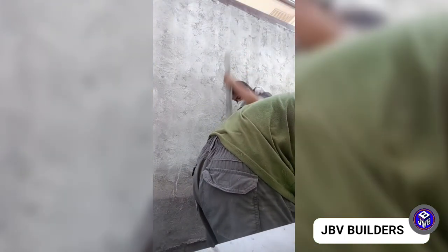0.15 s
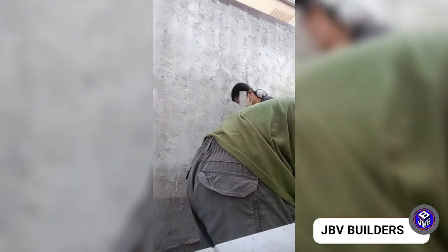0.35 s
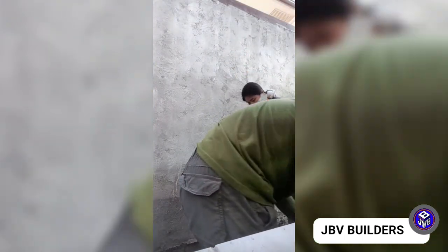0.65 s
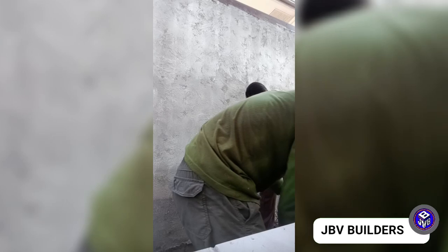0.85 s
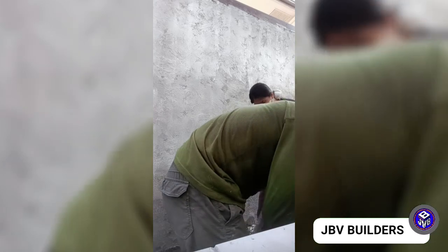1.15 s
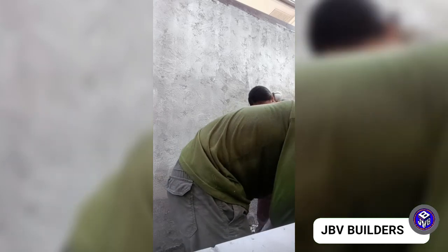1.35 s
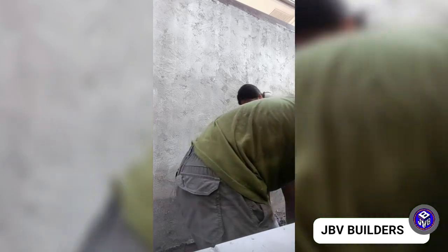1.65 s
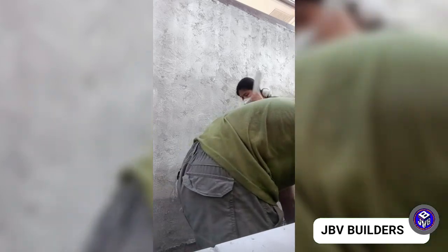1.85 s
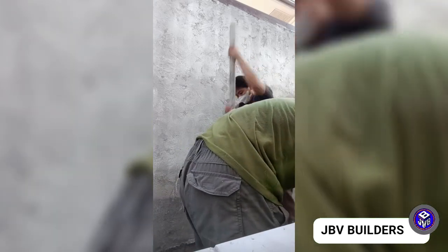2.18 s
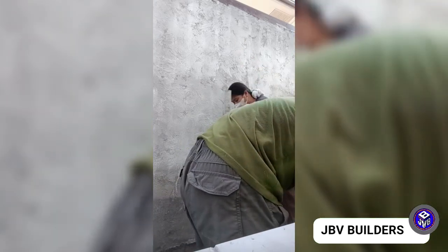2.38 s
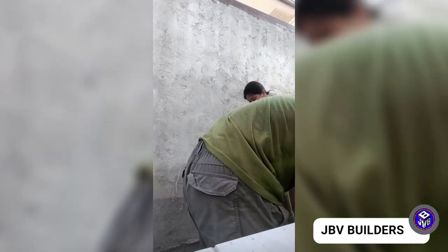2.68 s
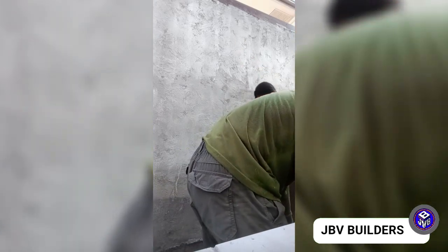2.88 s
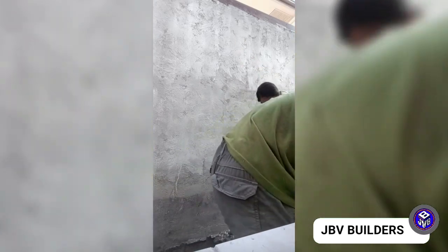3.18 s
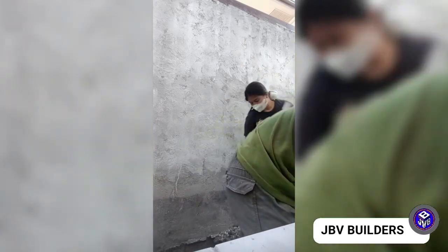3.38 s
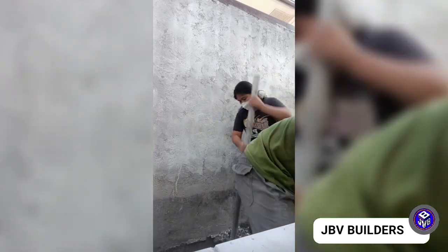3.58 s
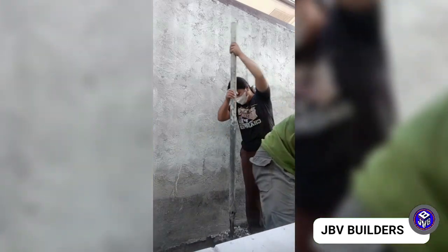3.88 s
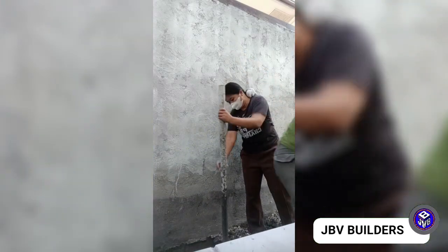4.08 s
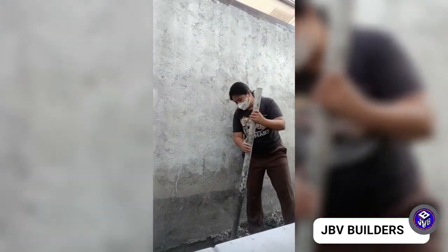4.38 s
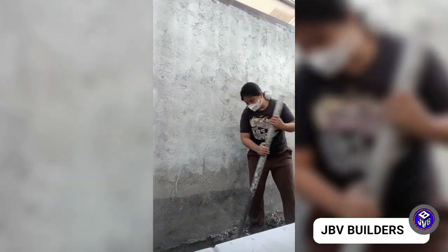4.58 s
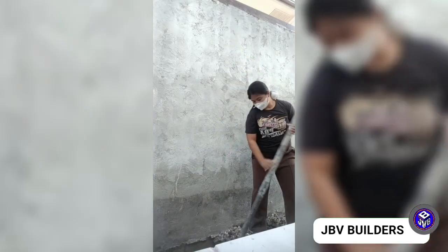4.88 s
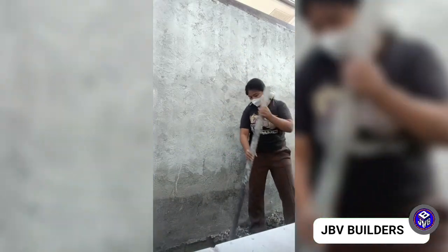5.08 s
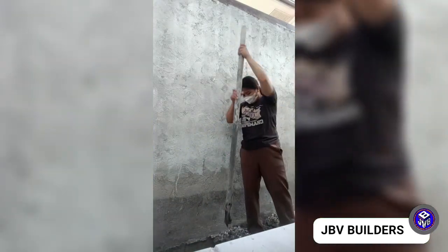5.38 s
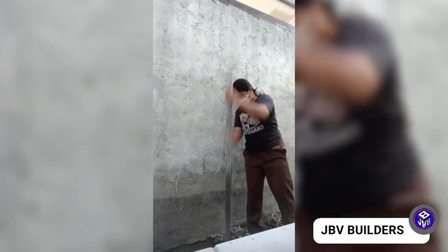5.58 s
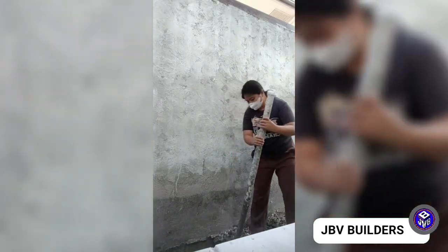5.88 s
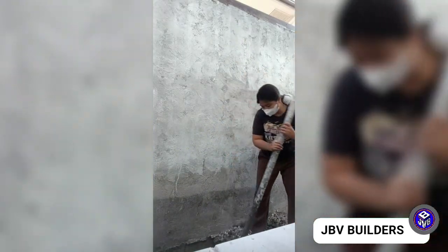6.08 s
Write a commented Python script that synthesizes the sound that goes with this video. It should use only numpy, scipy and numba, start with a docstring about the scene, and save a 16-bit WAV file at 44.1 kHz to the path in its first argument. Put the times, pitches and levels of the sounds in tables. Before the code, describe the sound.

Sharp metallic clangs of a long bar digging into stony ground, with gravel shifting and grinding between the blows.

```python
"""Steel bar in gravel

Beside a concrete wall, a few metres from a phone microphone, a long steel bar is jabbed and levered
into gravel. Each jab crushes grit and rings the bar; levering grinds cobbles, pebbles and grit.
A big stone drops with a thud, single stones clink and rasp, and the ground rumbles over faint site hiss."""
import sys
import numpy as np
from scipy import signal
from scipy.fft import rfft, irfft
from scipy.io import wavfile
from numba import njit

SR = 44100
rng = np.random.default_rng(int(sys.argv[2]) if len(sys.argv) > 2 else 0)


def digitize_waveform(pressure):
    """Quantize a signal to 16-bit integers and store it at the path in sys.argv[1].

    Rows of a 2-D input are taken as channels; values are limited to [-1, 1].
    """
    field = np.atleast_2d(pressure).T
    bounded = np.clip(field, -1, 1)
    quanta = np.round(bounded * 32767).astype(np.int16)
    wavfile.write(sys.argv[1], SR, quanta)


N = 275184
T = np.arange(N) / SR

# Levels in the tables are relative; t60 is the time a ring takes to fall 60 dB.
# jabs of the bar: t/s, crush length/s, bending/dB, bright ring/dB, crack/dB, ground thump/dB
JABS = [(0.129, 0.029, -19.5, -26, -48, -28), (2.227, 0.019, -25, -30, -49, -27.5),
        (2.293, 0.018, -62, -50, -38.5, -35), (3.31, 0.019, -72, -51.5, -68, -63),
        (3.972, 0.03, -26, -17.5, -26.5, -25), (4.308, 0.019, -52, -40.5, -54, -53),
        (4.436, .015, -47, -47, -63, -49), (5.539, 0.027, -57, -24.5, -44, -17.5)]
# modes of the steel bar: f/Hz, level/dB, t60/s
BAR_MODES = [(535, -13.5, 0.21), (832, -7.5, 0.19), (874, -22, 0.164), (1187, -3, 0.073), (1299, -7, 0.12),
             (1520, -18, .2), (1900, -17, 0.28), (2210, -50, .2), (2127, -34, .2), (2623, -9.5, 0.18),
             (2703, -4, 0.38), (2657, -17, 0.72), (3130, -28, 0.11), (3144, -7.5, 0.15), (3280, -5, 0.086),
             (3410, -12.5, 0.2), (3770, -24, 0.32), (4320, -16, 0.074), (4620, -15, 0.14), (4930, -34, .1),
             (5420, -30, 0.12), (5520, -38, 0.15), (6400, -51, 0.18), (7400, -27, 0.13),
             (7870, -14.5, 0.07)]
# packed ground under the tip: f/Hz, level/dB, t60/s
PACKED_GROUND_MODES = [(80.5, -3.5, 0.27), (123, -5.5, 0.14)]
# the bar grinds along stones: peak t/s, rise/s, fall/s, level/dB
GRINDS = [(.2, 0.038, 0.083, -43), (4.16, 0.085, 0.17, -31.5), (4.52, 0.057, 0.073, -45),
          (5.0, 0.15, .1, -50), (5.58, 0.055, .1, -39), (5.8, 0.11, 0.34, -37), (6.2, 0.035, .1, -39)]
# shoves of gravel: peak t/s, rise/s, fall/s, pebbles/dB, cobbles over pebbles/dB, grit over pebbles/dB
SHOVES = [(0.0, 0.37, 0.059, -46, 6, -19), (0.145, 0.018, 0.076, -31, 5, -14),
          (0.223, 0.112, 0.084, -45.5, 5.5, -17), (0.409, 0.24, 0.089, -59.5, -2.5, -6.5),
          (0.498, 0.077, 0.074, -56.5, -2, -12), (0.609, 0.065, 0.13, -59, -6.0, -10),
          (0.741, 0.074, 0.1, -54.5, -2.5, -11.5), (0.842, 0.081, 0.17, -51.5, 5, -5.5),
          (1.017, 0.069, 0.021, -57, 6, -12), (1.17, 0.014, 0.052, -39, 20, -18.5),
          (1.298, 0.2, 0.044, -51, 9.5, -10.5), (1.36, 0.019, 0.026, -52.5, 13, -10),
          (1.452, 0.053, 0.035, -44.5, -1.5, -12), (1.498, 0.062, 0.08, -43.5, -5, -8.5),
          (1.59, 0.22, 0.13, -50.5, -11, -25), (1.759, 0.066, 0.17, -52, -6.5, -4),
          (1.873, 0.073, 0.06, -42, -2, -1.0), (1.925, 0.033, 0.039, -50, 5.5, -1.5),
          (2.052, 0.17, 0.078, -61, 4.5, -9), (2.151, 0.034, 0.088, -52.5, -2, -7.5),
          (2.237, 0.027, 0.073, -35.5, -6.5, -7.5), (2.531, 0.18, 0.035, -58.5, 1.5, -9),
          (2.565, 0.02, 0.065, -38.5, 1.0, -11.5), (2.699, 0.081, 0.081, -62.0, 5.5, 0),
          (2.8, 0.021, 0.046, -55, 1, 2), (2.868, 0.083, 0.064, -52.5, 0.5, -8),
          (3.051, 0.11, 0.016, -52, -1.5, -18), (3.192, 0.18, 0.068, -64, 7.5, -7),
          (3.319, 0.11, 0.12, -61, -1.5, -4.5), (3.417, 0.038, 0.078, -59.5, 4, -11),
          (3.549, 0.12, 0.034, -59, -4.5, -10), (3.611, 0.03, 0.087, -43.5, 2.5, -12.5),
          (3.691, 0.034, 0.078, -41.0, 2, -5), (3.939, 0.099, 0.034, -54, 10.5, -2),
          (3.979, 0.008, 0.022, -17.5, -17, -19), (4.07, 0.44, 0.11, -42, -8, -10.5),
          (4.169, 0.094, 0.078, -39, 0, -2), (4.25, 0.045, 0.048, -41, 8, -6),
          (4.337, 0.042, 0.068, -47, -1.5, -5), (4.447, 0.082, 0.2, -48.5, -0.5, -15),
          (4.555, 0.068, 0.092, -41.5, -15, -8), (4.652, 0.15, 0.24, -41, 2, -9),
          (4.816, 0.088, 0.07, -34, -1, -4), (4.983, 0.097, 0.12, -39.5, -6.5, -4),
          (5.091, 0.065, 0.19, -43, 2, 5.5), (5.183, 0.091, 0.11, -34.5, -9, -3.5),
          (5.303, 0.131, 0.079, -34, -15, -1), (5.404, 0.052, 0.052, -38.5, -15, 2),
          (5.498, 0.18, 0.14, -36, -15, -30), (5.563, 0.079, 0.084, -30, -9, -7),
          (5.717, 0.058, 0.082, -26, -8.5, -7.5), (5.874, 0.17, 0.017, -35, -9, -14.5),
          (5.956, 0.083, 0.048, -28, -9, -5), (6.139, 0.1, 0.025, -31.5, -10.0, -14.5),
          (6.195, 0.058, 0.097, -27.5, 0.5, -6)]
# spectrum of the gravel: f/Hz, density/dB
GRAVEL_SPECTRUM = [(120, -40), (200, -12.5), (408, 3.5), (507, -2), (816, 0.5), (1090, -0.5), (1260, 2),
                   (1520, 0.5), (2670, 0), (3850, -3), (4140, -12.5), (7160, -7), (8600, -13),
                   (9590, -10.5), (15700, -19)]
# modes of the big stone: f/Hz, level/dB, t60/s
BIG_STONE_MODES = [(158, -2, 0.11), (319, 6.5, 0.047), (415, 6.5, 0.064), (594, -35, 0.28), (820, -6, 0.11),
                   (965, -14, 0.23), (1200, -35, 0.17), (1560, -38, 0.08), (1940, -37, 0.31),
                   (1960, -43, 0.24)]
# single stones knocked: t/s, level/dB, f/Hz, t60/s, click offset/dB
CLINKS = [(0.405, -30, 1280, 0.07, -24), (0.489, -31.5, 1440, 0.063, -24), (0.72, -32, 3530, 0.058, -21),
          (0.832, -18.5, 706, 0.063, -34), (1.006, -27, 544, 0.075, -15.5), (1.314, -21, 510, 0.06, -25),
          (1.361, -35, 890, 0.066, -10), (1.436, -25.5, 488, 0.096, -7), (1.482, -36, 780, 0.04, 10.5),
          (1.602, -26, 1246, 0.06, -18), (1.715, -39, 1330, 0.056, -2), (1.815, -26.5, 570, 0.091, -12),
          (1.932, -45, 3020, .03, 11), (1.994, -29.5, 850, 0.063, -24), (2.145, -24.5, 2450, 0.059, -9),
          (2.553, -19.5, 520, 0.15, -26), (2.786, -36, 1200, 0.11, -12), (3.033, -25, 1070, 0.048, -21),
          (3.184, -34.5, 934, 0.05, -20), (3.264, -32, 530, 0.076, -26), (3.417, -34, 1130, 0.05, -15),
          (3.535, -38, 670, 0.065, -3), (3.584, -25, 1480, 0.05, -17), (3.604, -22, 1740, 0.05, -27),
          (3.686, -26.5, 564, 0.14, -14), (3.885, -25, 685, 0.087, -26), (4.502, -20, 2465, 0.086, -29),
          (4.617, -17.5, 686, 0.047, -17), (4.915, -22.5, 1670, 0.11, -24), (5.055, -18.5, 3016, 0.11, -2),
          (5.242, -17, 717, 0.069, -4), (5.314, -19, 766, 0.084, -10), (5.905, -15, 1240, 0.06, -10),
          (6.101, -14.5, 1940, 0.054, -11)]
# single stones rubbed hard: t/s, length/s, f/Hz, level/dB
RASPS = [(1.2, 0.056, 4300, -67), (1.264, 0.082, 3530, -65), (1.298, 0.11, 4600, -56),
         (1.531, 0.13, 7600, -61), (1.706, 0.14, 5780, -50), (1.719, .2, 7300, -65), (1.77, .14, 4570, -40),
         (1.842, 0.048, 6330, -36), (1.982, 0.13, 803, -49.5), (4.139, 0.19, 393, -39),
         (4.477, 0.087, 1770, -35), (4.605, 0.13, 647, -41), (5.219, .12, 750, -38.5),
         (5.266, .08, 426, -34), (5.437, 0.091, 1887, -34), (5.547, 0.073, 1313, -27),
         (5.732, .23, 1299, -29.5), (5.76, 0.11, 814, -35), (5.82, 0.17, 1730, -32), (6.153, .09, 624, -29)]
# thuds through the ground from feet and bar: peak t/s, length/s, level/dB
THUDS = [(-0.049, 0.21, -27.5), (0.178, 0.25, -37.5), (0.343, 0.15, -46.5), (0.495, 0.28, -47),
         (0.707, 0.17, -49), (0.853, 0.14, -47.5), (1.18, 0.053, -38), (1.282, 0.087, -33),
         (1.393, 0.17, -37.5), (1.542, 0.32, -50.5), (1.762, 0.16, -50), (1.937, 0.298, -42.5),
         (2.138, 0.087, -37), (2.257, 0.11, -35.5), (2.487, 0.113, -37), (2.628, 0.24, -44),
         (2.812, 0.15, -42), (3.499, 0.38, -49), (3.711, 0.36, -64.5), (4.006, 0.13, -32),
         (4.15, 0.154, -38.5), (4.356, 0.19, -44), (4.486, 0.15, -47), (4.608, 0.2, -40.5),
         (4.79, 0.21, -37.5), (4.956, 0.2, -43.5), (5.346, 0.4, -40), (5.559, 0.21, -30.5),
         (5.754, 0.448, -42), (5.937, 0.23, -40.5), (6.117, 0.22, -44), (6.206, 0.086, -29)]
# loose ground: f/Hz, level/dB, t60/s
LOOSE_GROUND_MODES = [(83, 3.5, 0.23), (109.9, 14.5, 0.13)]
# hiss of the site: f/Hz, density/dB
HISS_SPECTRUM = [(18, -43), (30, -20), (108, 0), (225, -21), (714, -19.5), (814, -19), (2380, -35),
                 (3260, -30), (4960, -37), (7540, -35), (15700, -40)]

# knocking stones: lowest f/Hz, highest f/Hz, knocks a second, ring scale/cycles, scatter/dB, sand/dB
COBBLES = (196.5, 796.5, 262, 26, 4.5, -8.5)
PEBBLES = (807.5, 4519, 2502, 28, 3, -4)
GRIT = (4505, 15702, 7004, 0.5, 2, -9)
# rubbing stones: lowest f/Hz, highest f/Hz, rubs a second, mean length/s, scatter/dB, wavers a second
SLABS = (400, 4300, 300, 0.091, 3, 106.5)
SHARDS = (3560, 11400, 270, 0.063, 5, 163)
SLABS_DB, SHARDS_DB = -4, -6  # over pebbles, over grit


def bar(pebble_motion, drag_db=-34, blow_db=-2.5, bend_below_hz=2000, rattle_db=4.5, rattle_s=0.011):
    """Jabs and dragging gravel ring the bar; its tip cracks grit and thumps the ground."""
    pressure = undb(drag_db) * pebble_motion + swells(*np.transpose(GRINDS))
    drag = pressure * rng.standard_normal(N) / np.sqrt(SR / 20)
    bend, bright, crack, thump = drag, drag, 0, np.zeros(N)
    for s, length, bend_db, ring_db, crack_db, thump_db in JABS:
        crush = burst(s, length)
        hit = crush.copy()
        hit[int((s + .4 * length) * SR)] += undb(blow_db)  # one clean blow within the crush
        bend = bend + undb(bend_db) * hit
        bright = bright + undb(ring_db) * hit
        crack = crack + undb(crack_db) * crush * np.sqrt(length * SR)
        thump[int(s * SR)] = undb(thump_db)
    tip = signal.lfilter(*signal.butter(1, [700, 5000], "band", fs=SR), crack)
    # gravel against the bar makes its bright ring flutter
    knots = np.arange(0, T[-1] + 1, rattle_s)
    flutter = undb(rattle_db * np.interp(T, knots, rng.standard_normal(len(knots))))
    bending = ring(bend, [mode for mode in BAR_MODES if mode[0] < bend_below_hz])
    ringing = ring(bright, [mode for mode in BAR_MODES if mode[0] > bend_below_hz])
    return bending + flutter * ringing + tip + ring(thump, PACKED_GROUND_MODES)


def gravel():
    """Each shove stirs three sizes of stone; returns their sound and the pebbles' motion."""
    s, rise, fall, db, cobble_db, grit_db = np.transpose(SHOVES)
    pebble_motion = swells(s, rise, fall, db)
    pebbles = pebble_motion * (knocks(*PEBBLES) + undb(SLABS_DB) * rubs(*SLABS))
    cobbles = swells(s, rise, fall, db + cobble_db) * knocks(*COBBLES)
    grit = swells(s, rise, fall, db + grit_db) * (knocks(*GRIT) + undb(SHARDS_DB) * rubs(*SHARDS))
    return pebbles + cobbles + grit, pebble_motion


def knocks(lo_hz, hi_hz, rate, cycles, scatter_db, sand_db):
    """Stones of one size class knock together at random; sand fills the gaps. Rms 1."""
    when, pitch, sustain, size = rng.random((int(rate * N / SR), 4)).T
    hz = lo_hz * (hi_hz / lo_hz) ** pitch
    t60 = cycles * (0.51 + 4.1 * sustain) / hz
    size_db = -scatter_db * np.log(1 - .97 * size)  # .97 limits the rare largest stones
    height = undb(colour(GRAVEL_SPECTRUM, hz) + size_db) * hz  # short high rings need more height
    clatter = grains(N, (when * N).astype(np.int64), hz, t60, height, SR)
    sand = noise(GRAVEL_SPECTRUM, lo_hz, hi_hz)
    return level(level(clatter, 0) + level(sand, sand_db), 0)


def rubs(lo_hz, hi_hz, rate, length, scatter_db, waver):
    """Stones of one size class rub at random and sing roughly. Rms 1."""
    out = np.zeros(N)
    for when, pitch, span, size, *catch in rng.random((int(rate * N / SR), 44)):
        hz = lo_hz * (hi_hz / lo_hz) ** pitch
        db = colour(GRAVEL_SPECTRUM, hz) + 10 * np.log10(hz) + 2 * scatter_db * (size - .5)
        add(out, when * T[-1], rub(length * (.5 + span), hz, db, catch, waver))
    return level(out, 0)


def rub(length, hz, db, catch, waver):
    """One rub swells and fades around one pitch, wavering as the faces catch."""
    t = T[:int(length * SR)]
    rough = np.sqrt(12) * (np.interp(t * waver, np.arange(len(catch)), catch) - .5)
    return undb(db) * rough * np.hanning(len(t)) * np.sin(2 * np.pi * hz * t)


def stone_drop(s=1.163, db=-17, contact_s=0.00019):
    """The big stone lands with one soft push and booms dully."""
    age = np.maximum(T - s, 0) / contact_s
    push = age * np.exp(-age)
    return ring(undb(db) * push / np.sum(push), BIG_STONE_MODES)


def clinks():
    """Each knocked stone gives a dry click and rings on its pitch and two weaker overtones."""
    s, db, hz, t60, click_db = np.transpose(CLINKS)
    clicks = 6 * sum(gain * burst(start, 0.0058) for start, gain in zip(s, undb(db + click_db)))
    out = signal.lfilter(*signal.butter(2, [600, 9000], "band", fs=SR), clicks)
    for ratio, partial_db in [(1, -13), (1.7, -35), (2.6, -58)]:
        out += grains(N, (s * SR).astype(np.int64), hz * ratio, t60 / ratio, undb(db + partial_db), SR)
    return out


def rasps(wavers_per_cycle=.08):
    """Single hard rubs of stone on stone; higher ones waver faster."""
    out = np.zeros(N)
    for (s, length, hz, db), catch in zip(RASPS, rng.random((len(RASPS), 200))):
        add(out, s, rub(length, hz, db, catch, wavers_per_cycle * hz))
    return out


def ground_rumble(rise_share=0.39):
    """The loose ground shudders with each thud."""
    s, length, db = np.transpose(THUDS)
    shudder = level(ring(rng.standard_normal(N), LOOSE_GROUND_MODES), 0)
    return swells(s, rise_share * length, (1 - rise_share) * length, db) * shudder


def wall_echo(direct, t60=0.13, db=-11):
    """Wall and ground send a short, dense, duller echo to the microphone, 4 ms behind the direct sound."""
    t = T[:SR // 2]
    tail = rng.standard_normal(len(t)) * undb(-60 * t / t60) * (t > .004)
    tail = signal.lfilter([1], [1, -.5], tail)
    return undb(db) * signal.fftconvolve(direct, tail / np.sqrt(np.sum(tail ** 2)))[:N]


def site_hiss(db=-59):
    """Faint steady noise of the site, strongest in the bass."""
    return level(noise(HISS_SPECTRUM, 30, 17000), db)


def burst(s, length, rise_share=0.14):
    """Rough contact force: a quick rise, then dying clicks."""
    age = np.maximum(T - s, 0) / length
    shape = (1 - np.exp(-age / rise_share)) * np.exp(-age ** 2)
    rough = rng.standard_normal(N) * undb(1.3 * rng.standard_normal(N))
    return shape * rough / np.sqrt(np.sum(shape ** 2))


def swells(s, rise, fall, db, edge_db=-20):
    """Gain of bell-shaped swells added as powers; each is at edge_db one rise before, one fall after."""
    t = T[::64]
    late = t - s[:, None]
    widths_from_peak = late / np.where(late < 0, rise[:, None], fall[:, None])
    power = undb(db[:, None] + edge_db * widths_from_peak ** 2) ** 2
    return np.interp(T, t, np.sqrt(np.sum(power, axis=0)))


def ring(force, modes):
    """A force through damped modes; a unit tick gives each mode its listed height."""
    out = np.zeros(N)
    for hz, db, t60 in modes:
        pole = np.exp(2j * np.pi * hz / SR - np.log(1000) / (t60 * SR))
        out += undb(db) * signal.lfilter([1], [1, -pole], force).imag
    return out


@njit
def grains(count, start, hz, t60, height, sr):
    """Many short damped rings, each with its own pitch."""
    out = np.zeros(count)
    for k in range(len(start)):
        phasor = height[k] + 0j
        pole = np.exp(2j * np.pi * hz[k] / sr - np.log(1000) / (t60[k] * sr))
        for i in range(start[k], min(count, start[k] + int(t60[k] * sr))):
            out[i] += phasor.imag
            phasor *= pole
    return out


def noise(spectrum, lo_hz, hi_hz):
    """Noise of a given spectrum inside a band."""
    hz = np.arange(N // 2 + 1) * SR / N
    gain = undb(colour(spectrum, hz)) * (hz > lo_hz) * (hz < hi_hz)
    return irfft(rfft(rng.standard_normal(N)) * gain, N)


def colour(spectrum, hz):
    """Level/dB of a spectrum at given frequencies."""
    knots_hz, db = np.transpose(spectrum)
    return np.interp(np.log(np.maximum(hz, 1)), np.log(knots_hz), db)


def undb(db):
    return 10 ** (np.asarray(db) / 20)


def level(x, db):
    return x * undb(db) / np.sqrt(np.mean(x ** 2))


def add(out, s, sound):
    start = int(s * SR)
    out[start:start + len(sound)] += sound[:N - start]


def scene():
    """The digging from a few metres off, in mono; the bar and single stones echo off the wall."""
    crunch, pebble_motion = gravel()
    hits = bar(pebble_motion) + stone_drop() + clinks() + rasps()
    return (crunch + ground_rumble() + hits + wall_echo(hits) + site_hiss())[None]


def record(dry):
    """The phone microphone thins the bass below 43 Hz; the top is cut at 15.8 kHz."""
    thinned = signal.lfilter(*signal.butter(2, 43, "high", fs=SR), dry)
    return signal.sosfilt(signal.ellip(10, .2, 80, 15800, fs=SR, output="sos"), thinned)


dry = scene()
out = record(dry)
digitize_waveform(out)
```